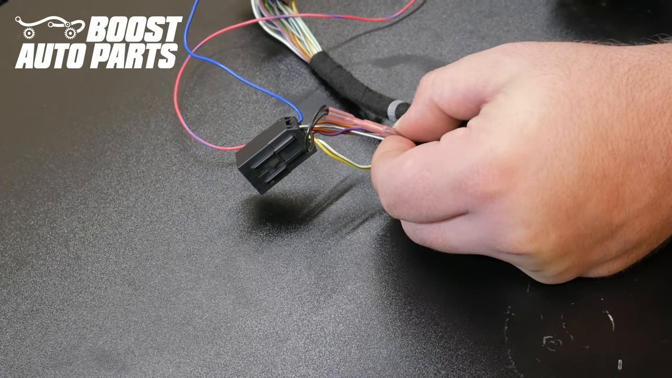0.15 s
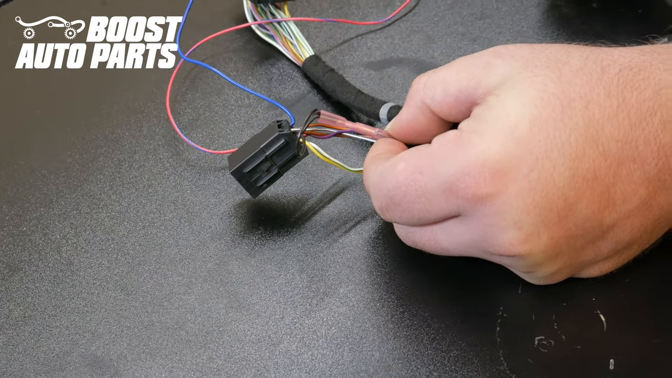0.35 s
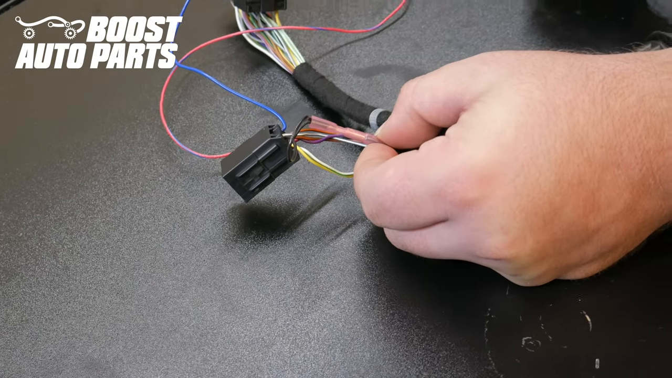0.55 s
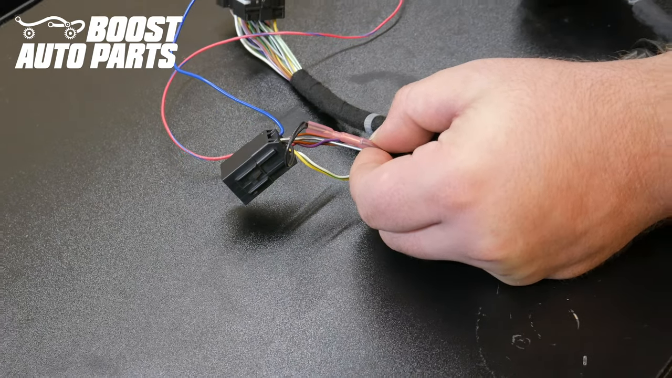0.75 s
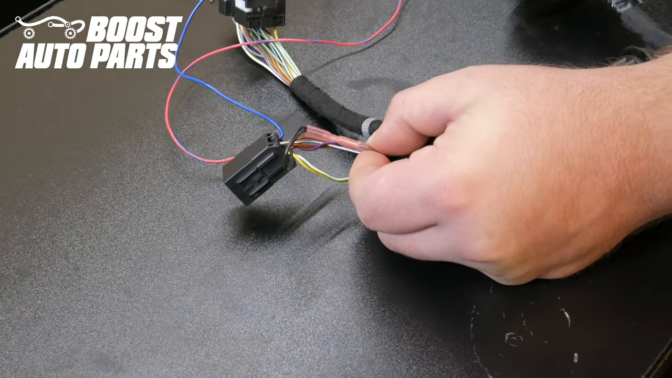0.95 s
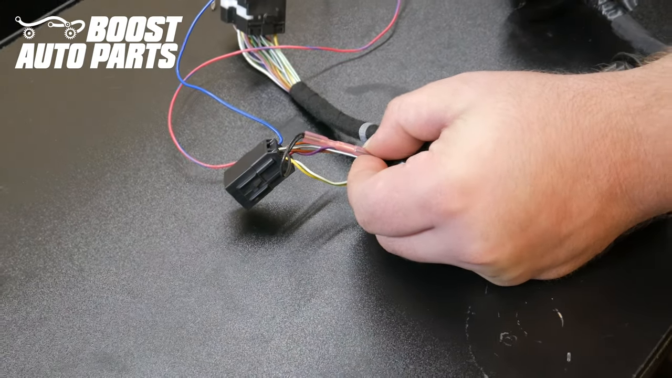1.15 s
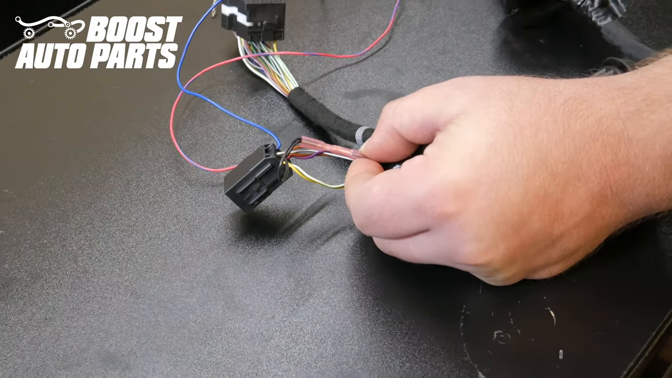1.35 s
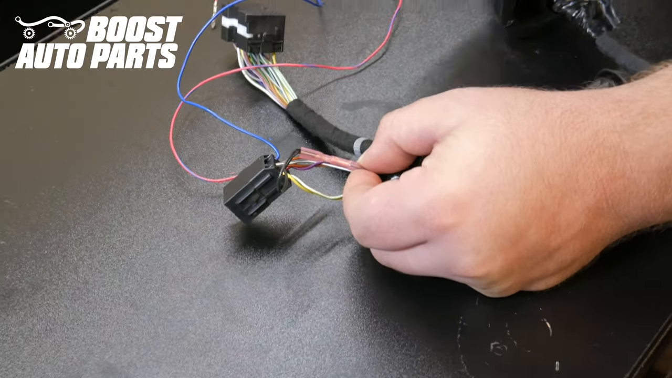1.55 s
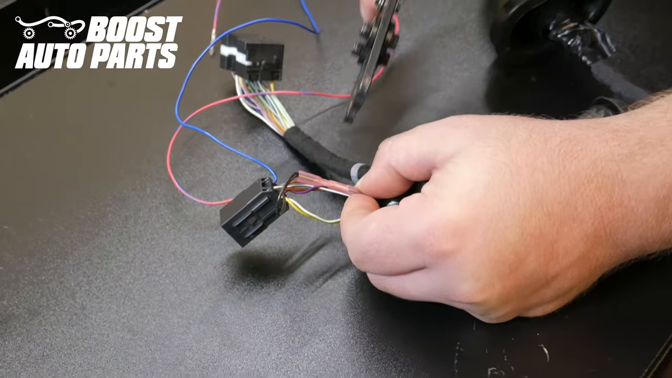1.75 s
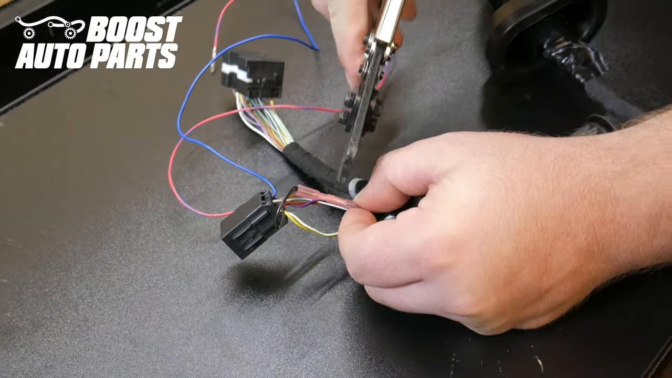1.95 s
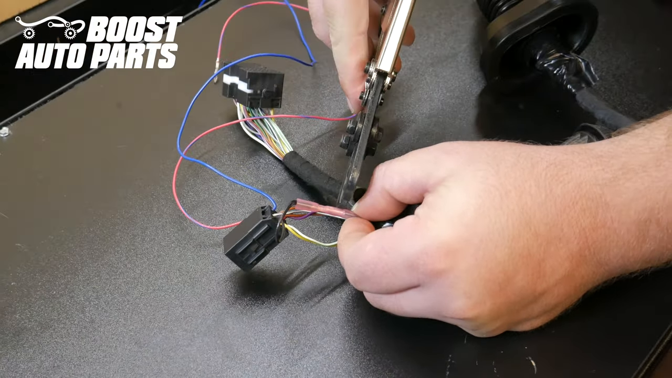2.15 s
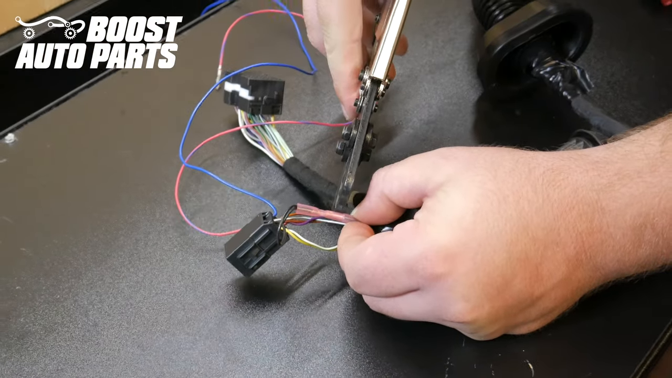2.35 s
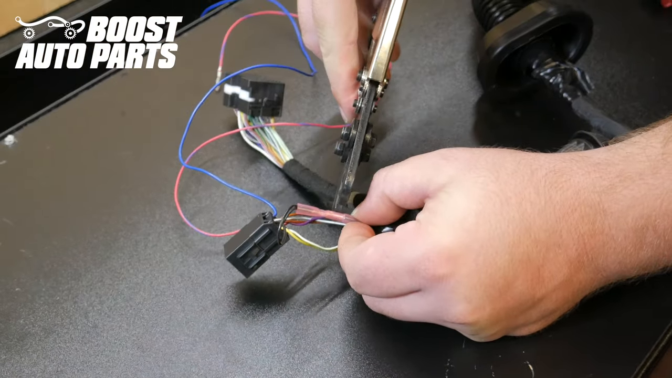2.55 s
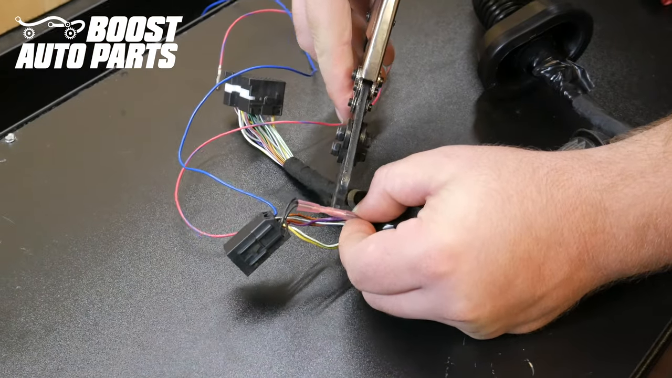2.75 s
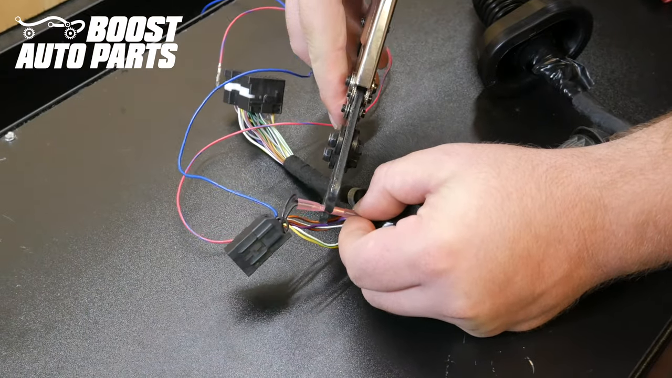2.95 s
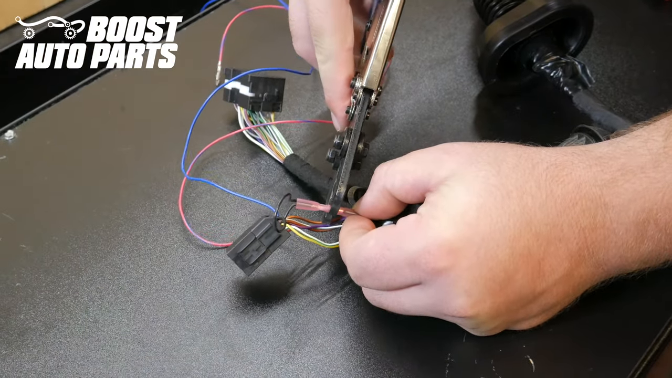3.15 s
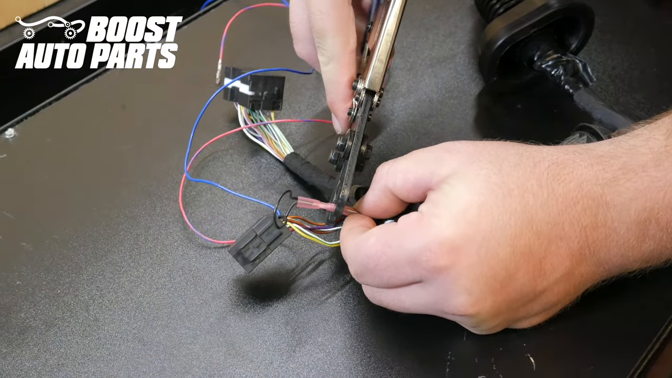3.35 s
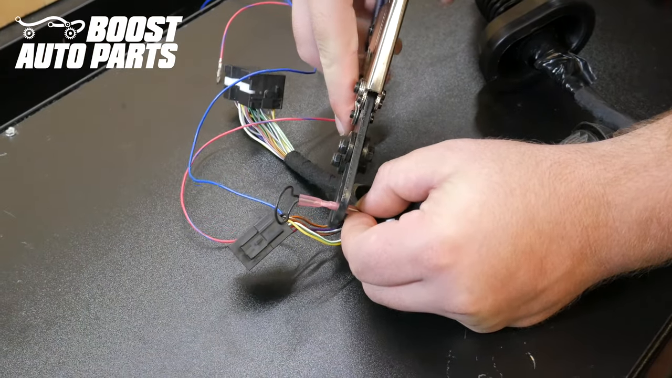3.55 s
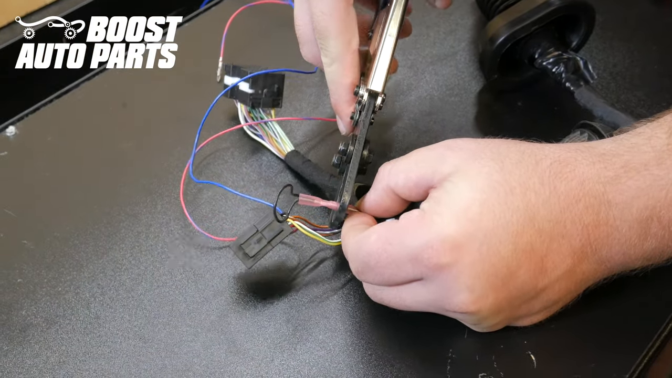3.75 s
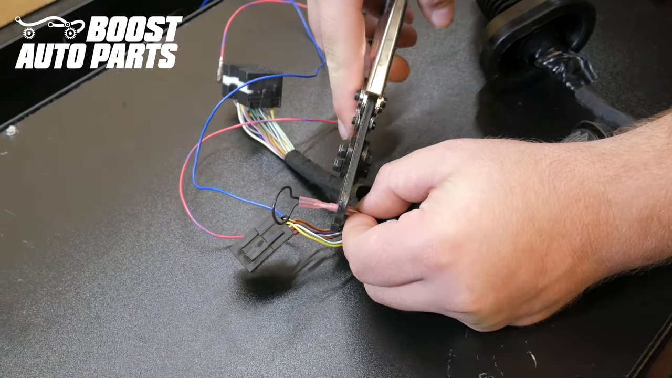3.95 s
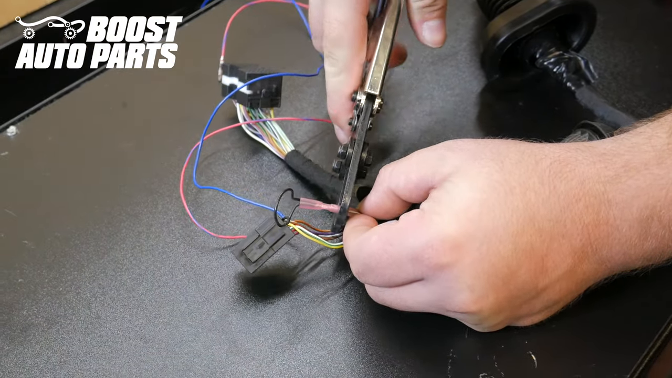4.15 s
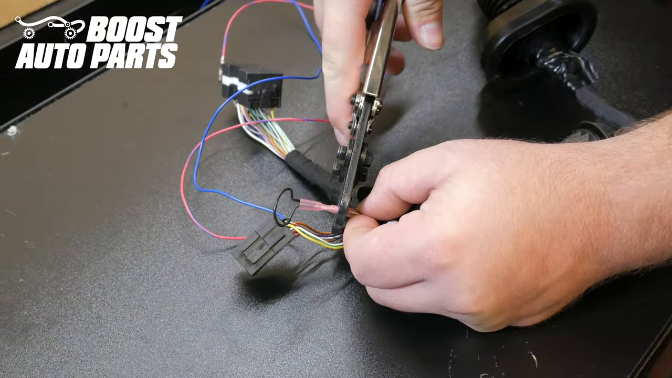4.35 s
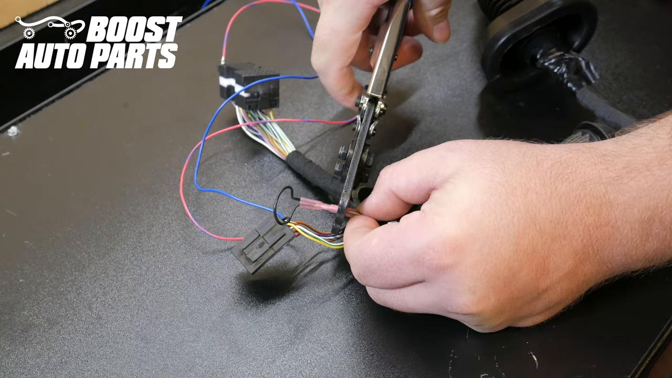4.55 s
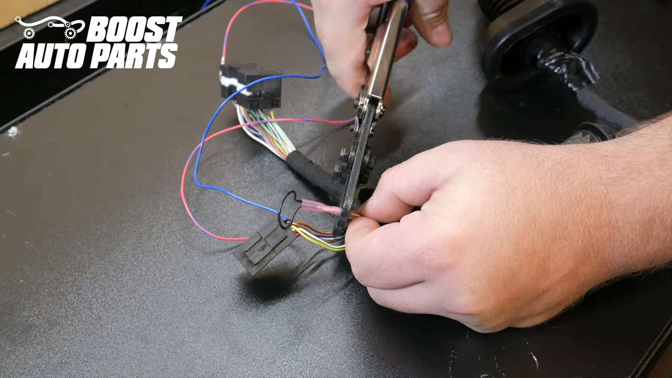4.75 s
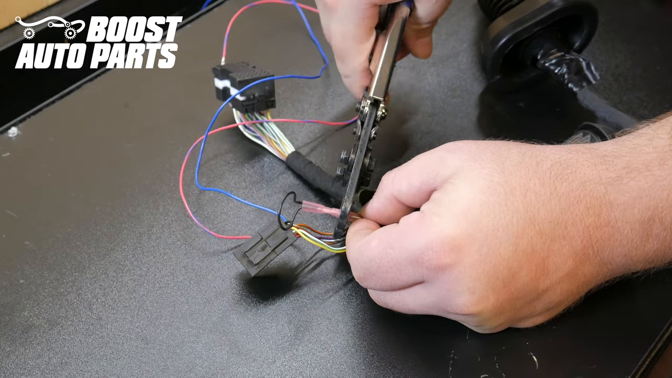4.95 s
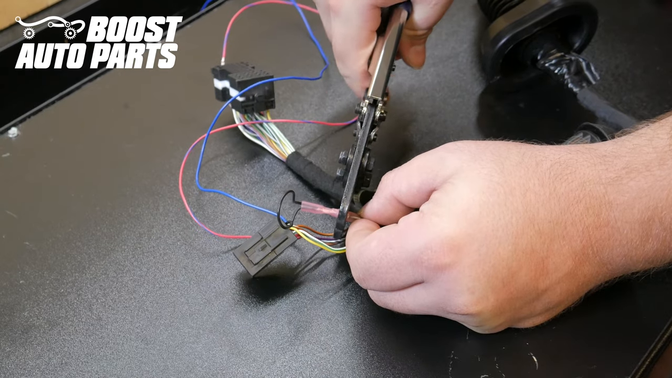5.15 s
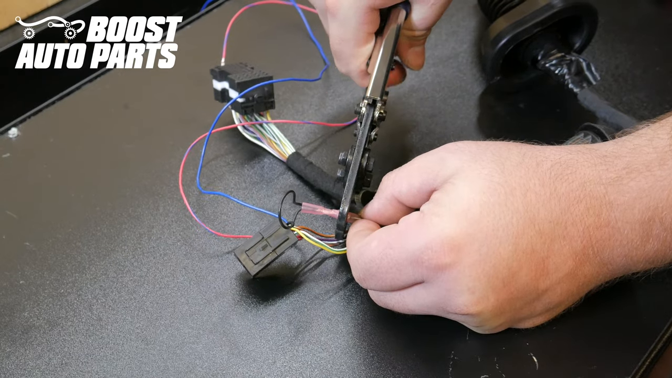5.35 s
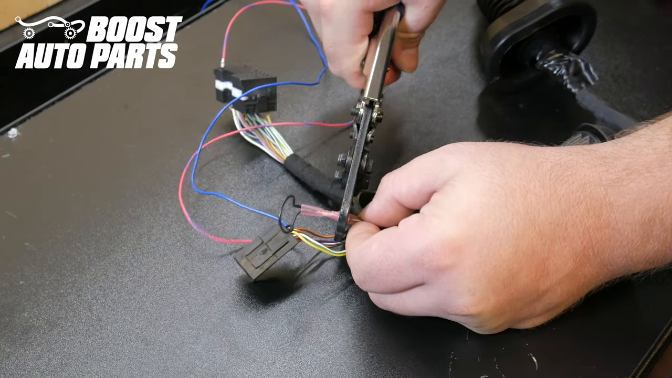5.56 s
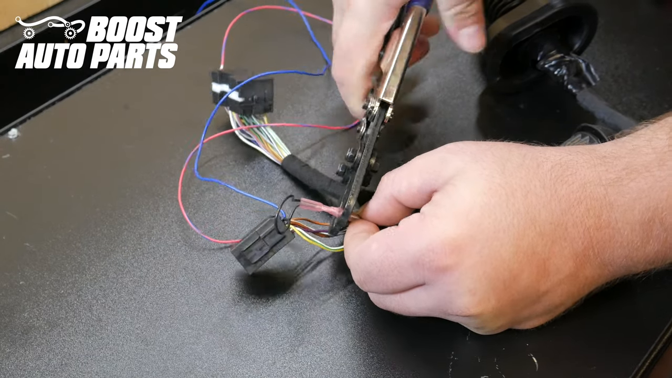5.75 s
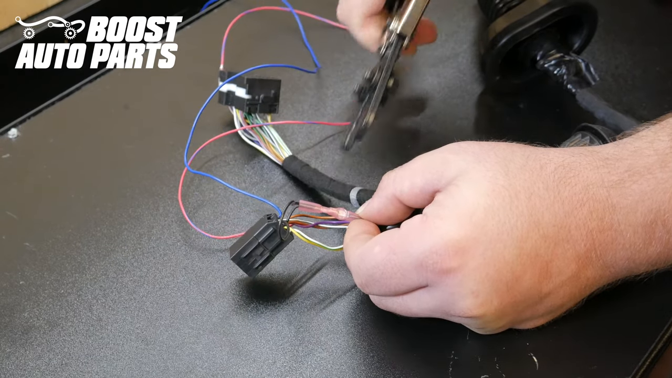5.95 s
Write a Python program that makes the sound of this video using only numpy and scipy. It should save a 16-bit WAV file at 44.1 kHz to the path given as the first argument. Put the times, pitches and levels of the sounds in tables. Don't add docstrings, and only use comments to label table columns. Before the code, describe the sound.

In a quiet shop with low ventilation rumble, a wire harness scrapes and knocks briefly on a bench, followed by sparse faint plastic ticks. After a couple of near-silent seconds, a ratchet crimper clicks in a rapid bright burst, then in more spaced snaps. A bench knock precedes the release, a loud snap and fast rattle of skipping teeth. Close stereo microphone, short room tail.

```python
import sys
import numpy as np
from scipy import signal
from scipy.fft import rfft, irfft
from scipy.io import wavfile

SR = 44100
rng = np.random.default_rng(int(sys.argv[2]) if len(sys.argv) > 2 else 0)


def log_audio(samples):
    frames = np.atleast_2d(samples).T
    limited = np.clip(frames, -1, 1)
    pcm = np.round(limited * 32767).astype(np.int16)
    wavfile.write(sys.argv[1], SR, pcm)


def voltage_ratio(level):
    return 10 ** (np.asarray(level, float) / 20)


N = 268569
SMALL_PART_HZ = np.geomspace(1500, 14000, 14)
KNOCK_HZ = np.geomspace(250, 2200, 14)

# centre_hz, width_hz, lift_db
STEEL_HUMPS = [(1930, 150, 7), (2660, 260, 0.5), (3130, 300, 6), (3800, 870, 5), (4500, 290, 0),
               (5520, 400, 4.5), (9300, 490, 2), (10270, 1300, 4.5), (12350, 720, 6.5), (15400, 600, -5)]


def steel_body():
    return body(1200, 15800, STEEL_HUMPS, short_s=0.0065, long_s=0.078, count=330)


# start_s, peak_db, jaw_ring_db, brightness_db_per_octave
PAWL_SNAPS = [(3.673, 0, 9.5, 0), (3.6983, -2, 10, 0), (3.725, -3, 11.5, 3), (3.7774, -4, 13, 1),
              (4.0393, -0.5, 9, 0.5), (4.103, -0.6, -1, -0.5), (4.6127, -1, -1.5, -0.5),
              (4.7926, -31, -5, 0), (4.8022, -1.5, -0.5, 0.5), (4.902, -4, -3, 1), (4.9574, -5, 1, 0),
              (5.0222, -2.5, -6.5, 1.5), (5.1049, -1.5, -5.5, 0.5), (5.3533, -10.5, 5, 0.5),
              (5.7924, 3.5, 2.5, 0)]
# pitch_hz, level_db
SNAP_COLOUR = [(1900, -14), (3700, -7.5), (6500, -6), (11000, -1.5)]


def snaps(hz):
    octaves = np.log2(hz / 3700)
    jaw = np.exp(-(octaves / 0.31) ** 2)
    shared_db = at_hz(SNAP_COLOUR, hz)
    return [(s, db, *(shared_db + jaw_db * jaw + tilt_db * octaves)) for s, db, jaw_db, tilt_db in PAWL_SNAPS]


# start_s, peak_db, pitch_hz, fall_db_per_octave
PAWL_SKIPS = [(5.8063, -6, 4500, 2), (5.8496, 0, 11100, 6.5), (5.8721, -6, 11100, 7),
              (5.8803, -4.5, 9000, 4.5), (5.888, -19.5, 3800, 12), (5.8958, -9, 9100, 5),
              (5.9105, -11.5, 6500, 15), (5.9294, -7.5, 11200, 7.5), (5.9448, -6.5, 11100, 16),
              (5.9586, -5, 11100, 16), (5.97, -7.5, 7500, 9), (5.9813, -11.5, 5840, 10)]


def pawl(steel):
    blows = snaps(SMALL_PART_HZ) + favouring(PAWL_SKIPS, SMALL_PART_HZ)
    return strikes(blows, SMALL_PART_HZ, steel, chatter_s=0.00066, bounce_share=0.12, spread=0.18, crack=0.6)


# start_s, hold_s, level_db
RATTLE_SWELLS = [
    (5.794, 0.021, -49),
    (5.858, 0.093, -30),
]


def rattle(steel):
    gain = swells(*np.transpose(RATTLE_SWELLS), attack_s=0.016, release_db_per_s=304)
    return gain * shaken(steel, tilt_db=1.0, clump_db=6.0)


# start_s, hold_s, fundamental_db, overtones_db against it
SING_SWELLS = [
    (0.063, 0.016, -55, -30),
    (3.679, .41, -53, 0),
    (4.596, 0.36, -61, -7),
    (4.95, 0.11, -54, -13),
    (5.808, .3, -61.5, -8),
]
# multiple, level_db
SING_LINES = [(1, 5.5), (2, -23.5), (3, -18.5), (4, -26), (5, -16), (7, -18), (8, -25), (10, -26),
              (11, -22.5), (12, -21), (13, -9.5), (14, -16)]


def singing():
    pitch_hz = 756.5 * (1 + 0.0012 * drift(18.0))
    turn = 2 * np.pi * np.cumsum(pitch_hz) / SR
    overtones = sum(voltage_ratio(db + 4.7 * drift(25.2)) * np.sin(k * turn + k * k) for k, db in SING_LINES[1:])
    s, hold, db, overtone_db = np.transpose(SING_SWELLS)
    lag_s = 0.092
    bloom = swells(s, hold / 2 - lag_s / 2, overtone_db, lag_s, release_db_per_s=89)
    press = swells(s, hold, db, attack_s=0.032, release_db_per_s=499, sag_db_per_s=10.5)
    return np.sqrt(2) * press * (np.sin(turn) + bloom * overtones)


# start_s, pitch_hz, level_db
PING_NOTES = [
    (5.6197, 3550, -24.5),
    (5.3535, 3150, -27),
    (0.4074, 2200, -29.5),
    (0.1921, 2400, -38.5),
    (5.8063, 1800, -27.5),
    (5.98, 3800, -25),
    (5.0225, 2500, -34.5),
]


def pings():
    out = np.zeros(N + SR)
    t = np.arange(SR // 4) / SR
    for s, hz, db in PING_NOTES:
        decay = voltage_ratio(db - 60 * t / 0.06)
        out[round(s * SR):][:len(t)] += decay * np.sin(2 * np.pi * hz * t)
    return out[:N]


def plastic_body():
    return body(1300, 15500, [(4080, 200, 3.0)], short_s=0.0027, long_s=0.03, count=200)


# start_s, peak_db, pitch_hz, fall_db_per_octave
WIRE_TICKS = [(0.0037, -32.5, 1790, 17), (0.0777, -44, 2400, 15), (0.1638, -47, 2800, 12),
              (0.1921, -30.5, 2800, 4), (0.3516, -27, 2600, 17), (0.4074, -25.5, 2100, 12),
              (0.4487, -38, 1900, 19), (0.4654, -41, 1900, 0), (0.5083, -23.5, 8800, 7.5),
              (0.7313, -43, 2700, 22), (1.001, -32, 8500, 5.5), (1.0528, -33.5, 9000, 7),
              (1.0689, -34.5, 5000, 15), (1.1497, -22.5, 10900, 9), (1.3253, -31.5, 3220, 16),
              (1.371, -21, 2640, 6.5), (1.5404, -38.5, 6100, 9), (1.9785, -50, 2410, 3),
              (2.1366, -42, 6500, 4), (2.7035, -45, 9200, 4.5), (3.1067, -42, 3800, 14),
              (4.3226, -53, 9900, 7), (4.3877, -44, 3200, 7.5), (0.213, -46, 3800, 12),
              (5.522, -49.5, 1890, 10.5), (5.6197, -24, 3700, 13), (5.6431, -25, 1900, 2.5),
              (5.7169, -33, 9000, 2.5), (5.7428, -33, 6000, 8)]


def ticks(plastic):
    blows = favouring(WIRE_TICKS, SMALL_PART_HZ)
    return strikes(blows, SMALL_PART_HZ, plastic, chatter_s=0.0034, bounce_share=0.4, spread=0.29, crack=0.098)


# centre_hz, width_hz, lift_db
BENCH_HUMPS = [(266, 13, 3.5), (321.6, 31, 7.5), (356, 27, 6.5), (468, 58, 11), (608, 20, 2),
               (651.5, 19, 14), (685.4, 22, 17.5), (770.4, 15.3, 9.5), (1001, 40, 9.5), (1227, 45, 9),
               (1664, 19, 16), (2145, 82, 14.5), (2380, 31, 20.5), (2930, 650, -16.5), (3560, 21, 7.5)]


def bench_body():
    return body(168.2, 3700, BENCH_HUMPS, short_s=0.028, long_s=0.13, count=150)


# start_s, peak_db, pitch_hz, fall_db_per_octave
BENCH_KNOCKS = [(0.003, -38.5, 750, 12), (0.089, -44, 600, 10), (0.192, -39.5, 1800, 4),
                (0.236, -44.5, 550, 26), (0.291, -35.5, 497, 7), (0.308, -21.5, 300, 15),
                (0.408, -16.5, 550, 16), (0.428, -25, 553, 24), (0.509, -27, 300, 4),
                (0.727, -38.5, 352, 7.5), (1.368, -32.5, 900, 9), (4.069, -35, 850, 11),
                (4.933, -28, 780, 14), (5.58, -24, 810, 25), (5.619, -11, 920, 3.5), (5.654, -25, 865, 24),
                (5.719, -37, 300, 3)]


def knocks(bench):
    blows = favouring(BENCH_KNOCKS, KNOCK_HZ)
    return strikes(blows, KNOCK_HZ, bench, chatter_s=0.0066, bounce_share=0.14, spread=0.35, crack=0.19)


# start_s, hold_s, weight_db, then judder_db and slide_db against it
DRAG_STROKES = [
    (.085, 0.027, -67.5, 7.5, 8),
    (.155, 0.074, -56, -6, -5),
    (.295, 0.083, -29, -3, -18.5),
    (0.399, .008, -34, 11.5, -29),
    (0.493, 0.015, -37.5, -5, -19),
    (5.574, 0.012, -40.5, 10, -17),
    (5.616, 0.012, -28, 2, -13),
    (5.699, 0.048, -49, -3, 8),
]
# pitch_hz, level_db per Hz
RUBBED_SURFACE = [(900, -6), (1500, -4), (3000, 8.5), (4500, 5), (8000, -5.5), (11000, -5.5), (15000, -28)]


def drag(bench):
    shake = shaken(bench, tilt_db=-6.5, clump_db=-2.0) + shaken(bench, tilt_db=-7.5, clump_db=1.0)
    upper = high_pass(shake, 570)
    lower = signal.sosfilt(signal.butter(4, 520, fs=SR, output="sos"), shake)
    rubbing = rng.standard_normal(N) * voltage_ratio(2.0 * drift(37.0))
    shape = voltage_ratio(at_hz(RUBBED_SURFACE, np.fft.rfftfreq(N, 1 / SR) + 1))
    hiss = irfft(rfft(rubbing) * shape, N)
    s, hold, weight_db, judder_db, slide_db = np.transpose(DRAG_STROKES)
    out = 0
    for db, part in [(0, lower), (judder_db, upper), (slide_db, hiss)]:
        stroke = swells(s, hold, weight_db + db, attack_s=0.017, release_db_per_s=320, sag_db_per_s=11.5)
        out = out + stroke * rms_one(part)
    return out


# start_s, peak_db, pitch_hz, fall_db_per_octave
HAND_JOLTS = [
    (4.935, -34.5, 400, 16),
    (5.24, -50.5, 890, 20),
    (5.765, -37.5, 280, 20),
    (5.793, -41, 700, 8),
    (5.85, -34.5, 500, -1),
]


def jolts(bench):
    blows = favouring(HAND_JOLTS, KNOCK_HZ)
    hits = strikes(blows, KNOCK_HZ, bench, chatter_s=0.005, bounce_share=0.18, spread=0.3, crack=0.1)
    return high_pass(hits[:2], 140)


# pitch_hz, t60_s
ROOM_RING = [(200, 0.41), (1000, 0.19), (3000, 0.18), (8000, 0.18), (15000, 0.21)]
# pitch_hz, level_db
ROOM_LEVEL = [(200, -14.5), (1000, -6.5), (3000, -10), (8000, -7.5), (15000, -23.5)]


def shop(x):
    t = np.arange(SR // 2) / SR
    tail = 0
    for hz, pair in bands(len(t)):
        tail = tail + voltage_ratio(at_hz(ROOM_LEVEL, hz) - 60 * t / at_hz(ROOM_RING, hz)) * pair
    shared, own = tail * (1 - np.exp(-t / 0.00058)) / np.sqrt(0.0054 * SR)
    sides = np.array([shared + 0.47 * own, shared - 0.2 * own])
    return signal.fftconvolve(x[None], sides, axes=1)[:, :N]


# pitch_hz, level_db per Hz
VENT_RUMBLE = [(11, -76), (18, -47.5), (48, -24), (66, -13.5), (138, 0.5), (194, -11.5), (291, -7),
               (331, -17), (353, -14), (519, -20.5), (730, -22.5), (886, -25.5), (1790, -32.5),
               (1910, -42.5), (3000, -33.5), (3900, -73.5), (6600, -120)]
# pitch_hz, level_db per Hz
AIR_HISS = [(880, -45.5), (1500, -27), (1940, -8.5), (2490, -8.5), (2800, -5.5), (3590, -2), (10500, -6),
            (14600, -12), (16000, -37)]
# pitch_hz, likeness (0 to 1)
STEREO_LIKENESS = [(60, 0.97), (130, 0.97), (290, 0.77), (640, 0.052), (1410, 0.018), (3100, 0.52),
                   (6820, 0.81), (15000, 0.56)]
# start_s, hold_s, hiss_db
SLEEVE_STIRS = [
    (0, 1, -72),
    (3.597, 0.058, -70.5),
    (4.493, 0.2, -72),
    (5.7, .4, -61),
]
# pitch_hz, width_hz, level_db
DUCT_WHISTLES = [(1932, 35, -73), (2820, 280, -73)]


def air():
    rumble, hiss = 0, 0
    for hz, (mid, side) in bands(N):
        alike = np.clip(at_hz(STEREO_LIKENESS, hz), 0, 1)
        pair = np.sqrt(1 + alike) * mid + np.sqrt(1 - alike) * side * [[1], [-1]]
        rumble = rumble + voltage_ratio(at_hz(VENT_RUMBLE, hz) + 1.7 * drift(3.5)) * pair
        hiss = hiss + voltage_ratio(at_hz(AIR_HISS, hz)) * pair
    stirring = swells(*np.transpose(SLEEVE_STIRS), attack_s=0.34, release_db_per_s=21.5)
    out = voltage_ratio(-47.5) * rms_one(rumble) + (voltage_ratio(-70.5) + stirring) * rms_one(hiss)
    for hz, width, db in DUCT_WHISTLES:
        gain = voltage_ratio(db + 1.5 * drift(0.82))
        b, a = signal.iirpeak(hz, hz / width, SR)
        out += gain * rms_one(signal.lfilter(b, a, rng.standard_normal((2, N))))
    return out


def body(low_hz, high_hz, humps, short_s, long_s, count):
    hz = np.sort(rng.uniform(np.sqrt(low_hz), np.sqrt(high_hz), count) ** 2)
    t60 = short_s * (long_s / short_s) ** (rng.random(count) ** 2)
    lift_db = sum(db / (1 + (2 * (hz - centre) / width) ** 2) for centre, width, db in humps)
    t = np.arange(SR // 10) / SR
    weight = (short_s / t60) ** 0.28
    decay = voltage_ratio(-60 * np.outer(1 / t60, t))
    return hz, lift_db, weight[:, None] * np.sin(2 * np.pi * np.outer(hz, t)) * decay


def strikes(events, colour_hz, modes, chatter_s, bounce_share, spread, crack):
    hz, lift_db, rings = modes
    out = np.zeros((3, N + SR))
    draws = rng.standard_normal((len(events), 2 * len(hz) + 600))
    grid = np.fft.rfftfreq(256, 1 / SR)
    for (s, peak_db, *colour), draw in zip(events, draws):
        strength, aim, bounce = np.split(draw, [len(hz), 2 * len(hz)])
        colour_db = lift_db + np.interp(np.log(hz), np.log(colour_hz), colour)
        uneven = np.tanh(2 * strength) + spread * aim * [[1], [-1]]
        ring = (uneven * voltage_ratio(colour_db)) @ rings
        contact = bounce_share * bounce * np.abs(bounce) * np.exp(-np.arange(600) / SR / chatter_s)
        contact[8] = 1
        spectrum = voltage_ratio(np.interp(grid, hz, colour_db, -90, -90)) / (grid + 300) ** 0.25
        smooth = np.roll(irfft(spectrum), 24)
        blow = signal.fftconvolve(ring, contact[None], axes=1)
        blow /= np.linalg.norm(blow[0])
        smooth /= np.linalg.norm(smooth)
        blow[:, :256] += crack * np.sign(bounce[0]) * smooth
        gain = voltage_ratio(peak_db) / np.abs(blow.mean(axis=0)).max()
        at = round(s * SR)
        out[:2, at:at + blow.shape[1]] += gain * blow
        out[2, at:at + 256] += gain * smooth
    return out[:, :N]


def favouring(rows, hz):
    return [(s, db, *(-fall_db * np.abs(np.log2(hz / centre)))) for s, db, centre, fall_db in rows]


def shaken(modes, tilt_db, clump_db):
    hz, lift_db, rings = modes
    grains = rng.standard_normal(N) ** 3 * voltage_ratio(clump_db * drift(60.0))
    strength = rng.choice([-1, 1], len(hz)) * voltage_ratio(lift_db + tilt_db * np.log2(hz / hz[0]))
    return rms_one(signal.fftconvolve(grains, strength @ rings)[:N])


def swells(start_s, hold_s, top_db, attack_s, release_db_per_s, sag_db_per_s=0):
    t = np.arange(0, N + 32, 32) / SR
    age = t - np.c_[start_s]
    after = np.clip(age - attack_s - np.c_[hold_s], 0, None)
    db = np.c_[top_db] - sag_db_per_s * age.clip(0) - release_db_per_s * after
    gain = np.clip(age / attack_s, 0, 1) ** 2 * voltage_ratio(db)
    return np.interp(np.arange(N) / SR, t, gain.sum(axis=0))


def drift(rate):
    r = np.exp(-80 * np.pi * rate / SR)
    slow = signal.lfilter([1], [1, -2 * r, r * r], rng.standard_normal(N // 40 + 2002))[2000:]
    return np.interp(np.arange(N) / 40, np.arange(len(slow)), rms_one(slow))


def bands(size):
    edges = 20 * 2 ** np.arange(0, 9.9, 0.4)
    white = rng.standard_normal((2, 2, size))
    for k, (low, high) in enumerate(zip(edges, edges[1:])):
        sos = signal.butter(2, [low, high], "band", fs=SR, output="sos")
        yield np.sqrt(low * high), signal.sosfilt(sos, white[k % 2])


def high_pass(x, hz):
    return signal.sosfilt(signal.butter(4, hz, "high", fs=SR, output="sos"), x)


def rms_one(x):
    return x / np.sqrt(np.mean(x ** 2) + 1e-20)


def at_hz(points, hz):
    table_hz, value = np.array(points).T
    return np.interp(np.log(hz), np.log(table_hz), value)


def scene():
    steel, plastic, bench = steel_body(), plastic_body(), bench_body()
    tool = high_pass(pawl(steel) + rattle(steel), 1780)
    wires = high_pass(ticks(plastic), 1100) * voltage_ratio([[0], [0], [-5.0]])
    thuds = high_pass(knocks(bench) + voltage_ratio(-4.0) * drag(bench), 120)
    near = tool + wires + thuds
    direct = near[:2] * voltage_ratio([[-0.2], [0.2]])
    return direct + shop(near[2]) + singing() * voltage_ratio([[1.5], [2.5]]) + air() + jolts(bench) + pings()


def roll_off(x):
    return signal.sosfilt(signal.butter(12, 16820, fs=SR, output="sos"), x)


def record(dry):
    limited = 2 * np.tanh(dry / 2)
    heard = signal.sosfilt(signal.butter(12, 15500, fs=SR, output="sos"), limited)
    return roll_off(heard)


dry = scene()
out = record(dry)
log_audio(out)
```